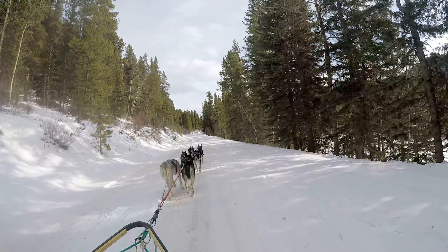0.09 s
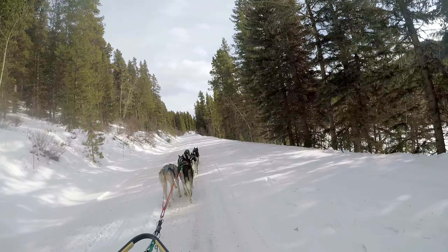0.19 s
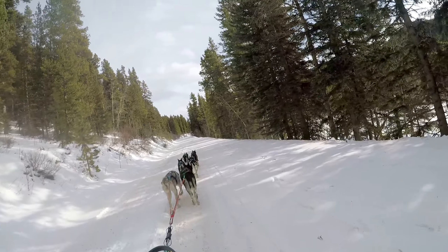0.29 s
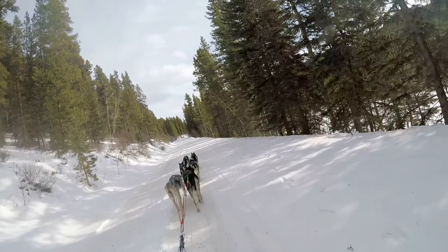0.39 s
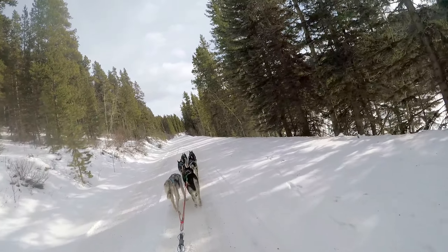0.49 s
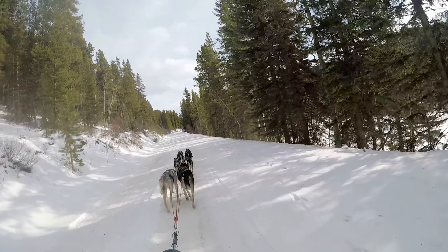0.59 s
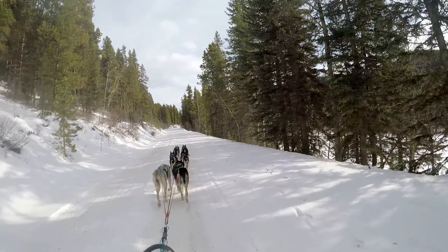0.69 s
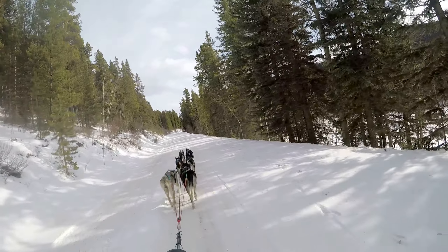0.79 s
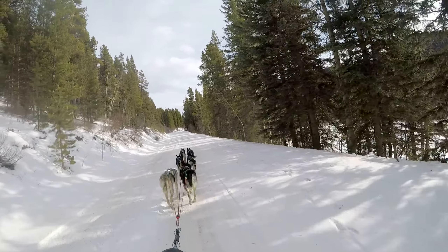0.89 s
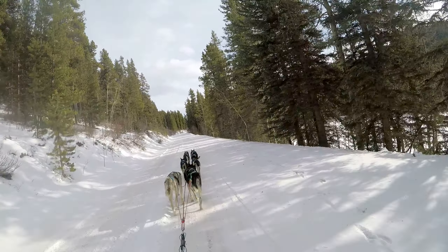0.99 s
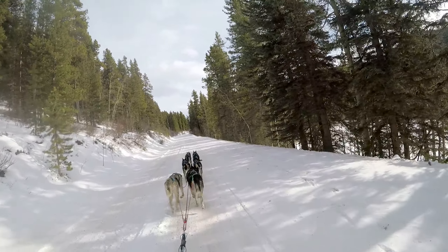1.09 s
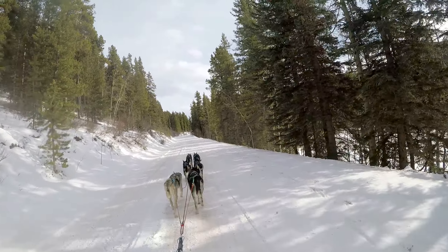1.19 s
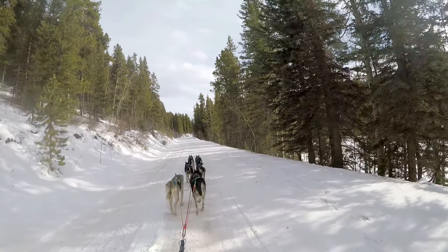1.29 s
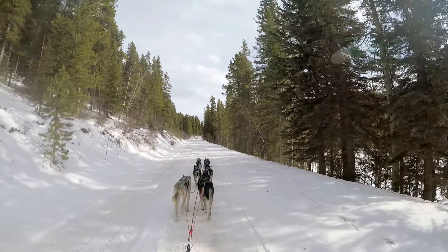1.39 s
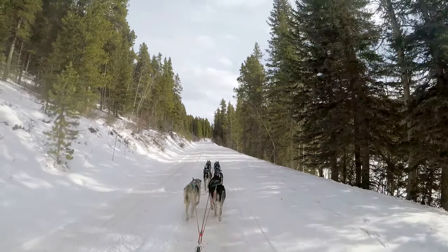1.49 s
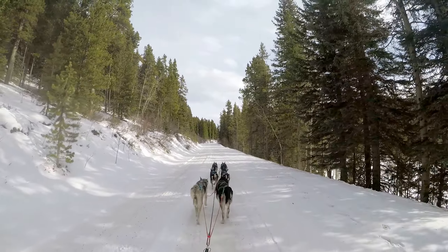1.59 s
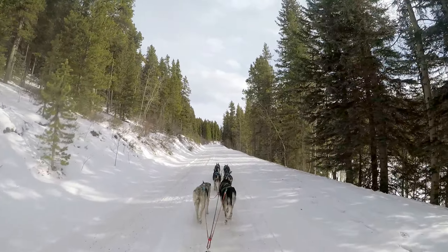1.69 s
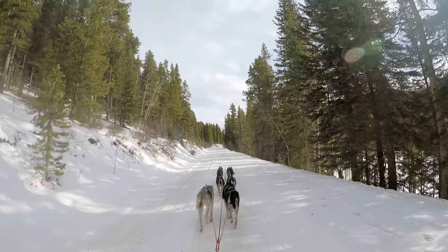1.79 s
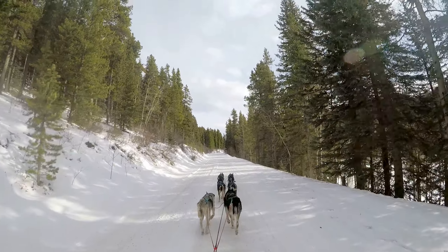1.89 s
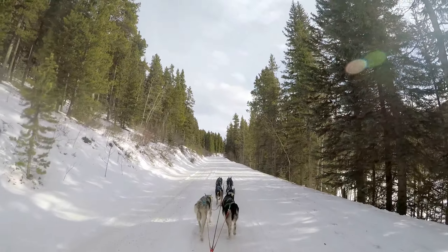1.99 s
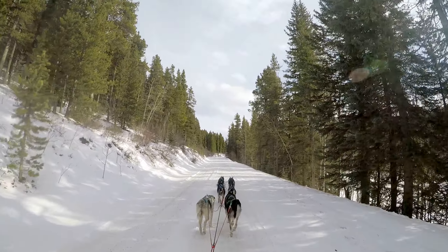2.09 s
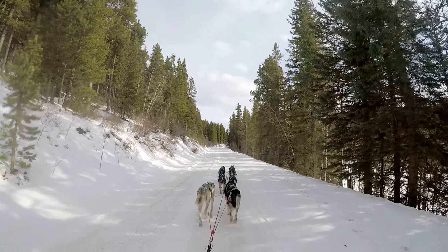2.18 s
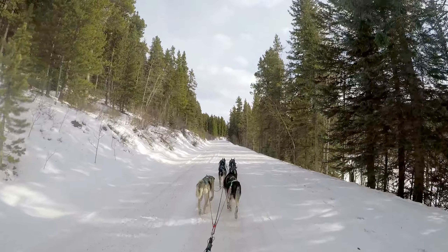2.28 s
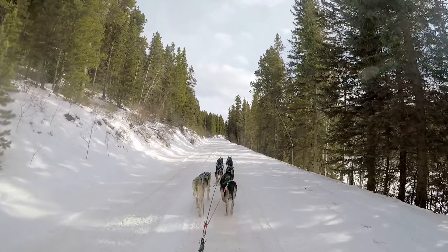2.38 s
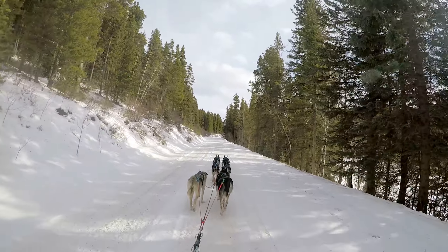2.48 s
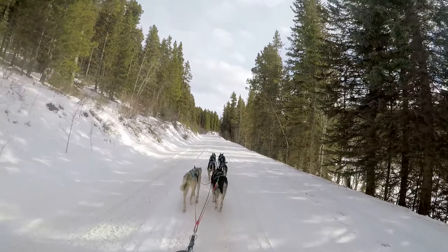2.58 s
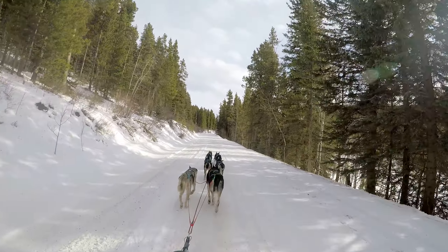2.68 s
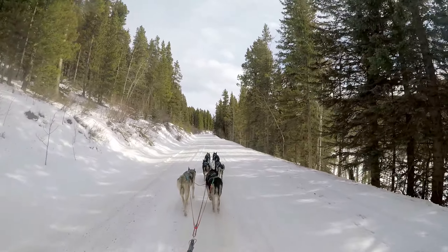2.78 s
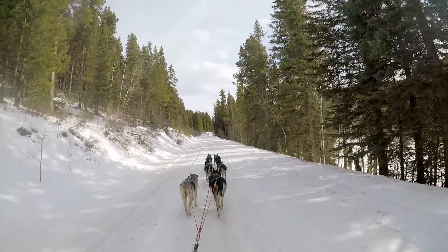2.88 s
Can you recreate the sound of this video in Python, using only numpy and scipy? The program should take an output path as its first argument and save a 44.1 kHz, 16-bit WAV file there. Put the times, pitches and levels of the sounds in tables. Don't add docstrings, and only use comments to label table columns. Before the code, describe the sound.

Sled runners scraping over packed snow, with hollow knocks, sharp clicks and low wind rumble

```python
import sys
import numpy as np
from scipy import signal
from scipy.fft import rfft, irfft, next_fast_len
from scipy.io import wavfile
from scipy.ndimage import uniform_filter1d, map_coordinates

SR = 44100
rng = np.random.default_rng(int(sys.argv[2]) if len(sys.argv) > 2 else 0)


def dump_mix(stems):
    frames = np.atleast_2d(stems).T
    limited = np.clip(frames, -1, 1)
    pcm = np.round(limited * 32767).astype(np.int16)
    wavfile.write(sys.argv[1], SR, pcm)


def field_ratio(decibels):
    return 10 ** (np.asarray(decibels, dtype=float) / 20)


N = 130095


def unit(x):
    return x / np.sqrt(np.mean(x ** 2) + 1e-20)


def along(points, hz):
    f, v = np.transpose(points)
    return np.interp(np.log(hz + 1), np.log(f + 1), v)


def curves(rows):
    s, *cols = np.transpose(rows)
    return [np.interp(np.arange(N) / SR, s, c) for c in cols]


def wobble(rate):
    return map_coordinates(rng.standard_normal(N // 200), [np.arange(N) * rate / SR])


def filtered(x, response):
    m = next_fast_len(N + SR // 2)
    return irfft(rfft(x, m) * response(np.fft.rfftfreq(m, 1 / SR)), m)[..., :N]


def body(modes, top_hz=2400):
    def response(f):
        total = 0
        for k, (centre_hz, width_hz, db) in enumerate(modes):
            loss = 1j * f * width_hz
            total = total + (-1) ** k * field_ratio(db) * loss / (centre_hz ** 2 - f * f + loss)
        return total / (1 + 1j * f / top_hz * 1.246 - (f / top_hz) ** 2) ** 2
    return response


def grains(rate, spread_db):
    chance, sign, size = rng.random((3, N))
    hit = chance < rate / SR
    return unit(hit * np.sign(sign - 0.5) * field_ratio(-spread_db * np.log(size + 0.02)))


def add_at(out, start_s, burst):
    out[:, round(start_s * SR):][:, :burst.shape[1]] += burst


# freq_hz, share_0_1
TIED = [(60, 1), (200, 0.47), (700, 0.57), (2500, 0.6), (6000, 0.5)]
# freq_hz, phase_rad
TURN = [(40, 1.17), (200, 2.3), (700, 2.24), (3000, 2.24), (9000, 2.3)]


def ports(push, other, centre, across, side_db):
    tie = lambda f: np.clip(along(TIED, f), 0, 1)
    mid = filtered(push, centre)
    tied = filtered(push, lambda f: across(f) * tie(f) * np.exp(1j * along(TURN, f)))
    free = filtered(other, lambda f: across(f) * np.sqrt(1 - tie(f) ** 2))
    side = field_ratio(side_db) * (tied + free)
    return np.array([mid + side, mid - side]), np.sqrt(np.mean(mid ** 2))


# start_s, strength_db, sway_over_strength_db
WIND = [(0, -30, -10), (.3, -24.5, -2.5), (.42, -19, -7.5), (.68, -22.5, -11), (.74, -20, 3),
        (.97, -18.5, -24), (1.04, -17.5, -5), (1.3, -10, -9), (1.6, -13.5, -6), (1.85, -18.5, 5),
        (2.1, -12.5, -10), (2.24, -9.5, -14), (2.28, -25.5, -9), (2.38, -19, 6.5), (2.5, -14.5, 2),
        (2.62, -18, -6.5), (2.75, -36, -10.5), (2.95, -52, 21.5)]
# freq_hz, width_hz, level_db
HOUSING = [(67, 46.3, -5), (91.76, 19.4, 2), (120.9, 23.8, -8.5)]
# freq_hz, width_hz, level_db
MOUNT = [(29, 22, -12), (43.7, 14.3, -1), (52.5, 7.2, -4)]
LUMPS_DB, LUMPS_PER_S = 1.2, 12
WIND_SIDE_DB, SWAY_SIDE_DB = -6, -15.5


def wind():
    strength_db, sway_db = curves(WIND)
    push = rng.standard_normal((4, N)) * field_ratio(LUMPS_DB * wobble(LUMPS_PER_S))
    shake = lambda f: body(HOUSING)(f) / (1 + (f / 125) ** 6)
    sway = lambda f: body(MOUNT)(f) / (1 + (f / 70) ** 4)
    ring, ring_rms = ports(*push[:2], shake, shake, WIND_SIDE_DB)
    slow, slow_rms = ports(*push[2:], sway, sway, SWAY_SIDE_DB)
    return field_ratio(strength_db) * (ring / ring_rms + field_ratio(sway_db) * slow / slow_rms)


# start_s, peak_db, pitch_hz
TICKS = [(0.6674, -28, 1850), (0.8006, -24, 1790), (0.9243, -18.5, 2010), (0.9565, -27, 2010),
         (1.0084, -21, 1640), (1.059, -25, 1880), (1.1763, -31, 1830), (1.274, -21.5, 1800),
         (1.4324, -41, 2080), (1.5159, -27, 1400), (1.5496, -51, 1500), (1.6377, -40.5, 1800),
         (1.6871, -45.5, 2000), (1.706, -38, 2000), (1.758, -37, 2040), (1.7818, -37, 1480),
         (1.7922, -30.5, 2150), (1.8637, -35.5, 1970), (1.8831, -33, 1800), (2.1425, -46.5, 2000),
         (2.176, -47.5, 1950), (2.2103, -44, 1700), (2.368, -40, 1690), (2.4157, -42, 1500),
         (2.5032, -37.5, 2003), (2.5385, -34.5, 1800)]
# start_s, peak_db, pitch_hz
PINGS = [
    (0.8955, -30, 3100),
    (1.1, -34, 5400),
    (1.179, -29, 5770),
    (1.198, -31.5, 3400),
    (1.29, -39, 4800),
    (1.7745, -45, 4450),
    (1.7843, -36, 3530),
    (1.786, -39, 4100),
    (2.2317, -32.5, 4370),
]
# start_s, peak_db, pitch_hz
CLACKS = [
    (0.357, -20.5, 662),
    (0.478, -28, 430),
    (0.609, -35.5, 750),
    (0.896, -27, 420),
    (0.9245, -13.5, 628),
    (1.008, -21, 484),
    (1.2695, -27.5, 600),
    (1.432, -35, 800),
    (1.705, -37, 650),
    (1.793, -33.5, 690),
]
TICK_S, TICK_RISE_S = 0.0013, 0.0008
TICK_DB, TICK_SIDE_DB = 5, -3.5


def ticks():
    out, t = np.zeros((2, N + SR // 50)), np.arange(SR // 50) / SR
    for start_s, db, hz in TICKS + PINGS + CLACKS:
        turn = rng.uniform(0, 2 * np.pi)
        near = rng.normal([[0.87], [1], [1.13]], 0.03)
        near = near - near.mean() + 1
        decay_s = TICK_S * max(1, np.sqrt(2000 / hz))
        fade = np.exp(-t / decay_s) * (1 - np.exp(-t / TICK_RISE_S)) ** 2
        angle = 2 * np.pi * hz * near * t
        mid = 1.33 * fade * np.sin(angle).sum(0)
        side = 1.33 * fade * np.sin(angle + turn).sum(0)
        add_at(out, start_s, field_ratio(db + TICK_DB) * (mid + field_ratio(TICK_SIDE_DB) * side * np.array([[1], [-1]])))
    return out[:, :N]


# start_s, peak_db, centre_hz
CRACKS = [(0.3593, -24.5, 1480), (0.9268, -25, 4000), (0.935, -36, 4520), (1.0068, -33.5, 2980),
          (1.099, -30, 5040), (1.1761, -28, 3450), (1.189, -42, 4500), (1.2696, -28.5, 4250),
          (1.306, -33.5, 4500), (1.3218, -31, 5500), (1.335, -36, 5500), (1.4232, -42, 4800),
          (1.4681, -38, 2900), (1.479, -45, 2600), (1.5222, -31.5, 5500), (1.5258, -33.5, 6000),
          (1.535, -41, 4500), (1.7895, -44, 6430), (1.8637, -40.5, 2600), (2.232, -23.5, 4300),
          (2.2341, -31, 5800), (2.539, -39.5, 2200)]
CRACK_TOP_HZ, CRACK_Q, CRACK_S, CRACK_GRIT = 7800, 1.9, 0.001, 0.5
CRACK_DB, CRACK_SIDE_DB = 0, -6


def cracks():
    out, t = np.zeros((2, N + SR // 100)), np.arange(SR // 100) / SR
    for start_s, db, hz in CRACKS:
        crumble = np.exp(-t / CRACK_S) * rng.standard_normal((2, len(t)))
        snap = (t == 0) + CRACK_GRIT * crumble
        burst = signal.lfilter(*signal.iirpeak(hz, CRACK_Q, SR), snap)
        mid, side = burst / np.abs(burst).max(axis=1, keepdims=True)
        add_at(out, start_s, field_ratio(db + CRACK_DB) * (mid - field_ratio(CRACK_SIDE_DB) * side * np.array([[1], [-1]])))
    return filtered(out[:, :N], lambda f: 1 / (1 + (f / CRACK_TOP_HZ) ** 8))


# start_s, peak_db, length_s
CRUNCHES = [(0.467, -37, 0.045), (0.715, -51, 0.015), (0.78, -35, 0.012), (0.919, -31, 0.022),
            (1.009, -29.5, 0.035), (1.094, -26.5, 0.013), (1.185, -28.5, 0.022), (1.266, -35.5, 0.057),
            (1.317, -31, 0.018), (1.466, -38.5, 0.013), (1.52, -32, 0.011), (1.783, -37.5, 0.019),
            (2.21, -46, 0.012), (2.23, -35.5, 0.022)]
# freq_hz, level_db
GLIDE = [(1290, 0.5), (2200, 3.5), (2720, 2), (6470, -3.5), (12400, -20), (14200, -36), (15500, -81)]
CRUNCH_DB, CRUNCH_SIDE_DB, CRUNCH_RISE_S, CRUNCH_TOP_HZ = -10, -3.5, 0.001, 7800


def crunches():
    t, shape = np.arange(N) / SR, np.zeros(N)
    for start_s, db, length_s in CRUNCHES:
        u = np.clip(t - start_s, 0, None)
        shape += field_ratio(db + CRUNCH_DB) * (1 - np.exp(-u / CRUNCH_RISE_S)) * np.exp(-(u / length_s) ** 2)
    push = grains(2800, 7) + 1.5 * rng.standard_normal((2, N))

    def bright(f):
        colour = field_ratio(along(GLIDE, np.maximum(f, 3000)))
        return colour * f / (f + 900) / (1 + (f / CRUNCH_TOP_HZ) ** 8)

    pair, rms = ports(*push, bright, bright, CRUNCH_SIDE_DB)
    return shape * pair / rms


# start_s, peak_db, rattle_over_peak_db, pitch_hz, rattle_across_db
KNOCKS = [(0.326, -21, -4.5, 228, 11.5), (0.355, -17.5, -10.5, 200, 16), (0.468, -28.5, -13, 215, 23),
          (0.595, -20, -14.5, 213, 14), (0.699, -21, -9, 258, 4), (0.738, -15.5, -43, 260, 9),
          (0.828, -16, -21, 273, -2), (0.9226, -12, -8, 153, -7), (1.007, -12, -12.5, 285, 2),
          (1.147, -11.5, -12.5, 217, 11.5), (1.27, -18.5, -10, 148, 7), (1.3, -15, -16.5, 253, 12),
          (1.433, -29.5, -4, 324, 10), (1.707, -19, -18, 277, 10), (1.791, -14.5, -16, 203, 11),
          (1.861, -24.5, -34.5, 259, 17), (2.138, -29, -10, 157, 15), (2.223, -21.5, -11, 275, 14)]
# start_s, length_s, level_db, pitch_hz
HUM = (0.92, 0.7, -28.5, 315)
# freq_hz, width_hz, level_db
FRAME = [(137.2, 31, 1), (221.5, 37, 1.5), (277.2, 41, 0.5), (318.7, 31.4, -1), (380, 41, -8)]
# freq_hz, width_hz, level_db
SCRAPE = [(438, 47.4, 2.5), (687, 131, -3), (846, 76, -3.5), (1157, 133, -9.5), (1400, 220, -10),
          (1873, 326, -8.5), (2190, 200, -10)]
# freq_hz, width_hz, level_db
ACROSS = [(215, 7.2, 3), (430, 130, -5.5), (729, 60, 3.5), (841, 117, -2.5), (990, 450, -6.5),
          (1180, 130, -7.5), (1560, 300, -13.5), (1800, 120, -13.5)]
KNOCK_RISE_S, KNOCK_DB, BLOW_DB = 0.00096, 2.5, 40
THUMP_T60_S, THUMP_SIDE_DB = 0.11, -10.5
SNAP_S, RATTLE_S, RATTLE_RISE_S = 0.01, 0.0097, 0.0026
RATTLE_DB, RATTLE_TOP_HZ = 21, 1300


def knocks():
    t = np.arange(SR // 3) / SR
    thump, push = np.zeros((2, 2, N + len(t)))
    blows = np.zeros(N)
    decay_db = -60 * t / THUMP_T60_S
    rise = (1 - np.exp(-t / KNOCK_RISE_S)) ** 2
    fade = np.exp(-t / np.array([[SNAP_S], [RATTLE_S]])) * (1 - np.exp(-t / RATTLE_RISE_S))
    for start_s, db, rattle_db, hz, across_db in KNOCKS:
        phase = rng.uniform(0, 2 * np.pi) + np.array([[0], [1.4]])
        add_at(thump, start_s, field_ratio(db + KNOCK_DB + decay_db) * rise * np.sin(2 * np.pi * hz * t + phase))
        blows[round((start_s + KNOCK_RISE_S) * SR)] = field_ratio(db + BLOW_DB) * np.sign(np.cos(phase[0, 0]))
        rattle = field_ratio(db + rattle_db + np.array([[0], [across_db]]))
        add_at(push, start_s, rattle * fade * rng.standard_normal((2, len(t))))
    start_s, length_s, db, hz = HUM
    swell = np.sin(np.pi * np.clip(t / length_s, 0, 1))
    hum = field_ratio(db) * swell * np.sin(2 * np.pi * hz * t + 0.91 * wobble(17)[:len(t)])
    add_at(thump[:1], start_s, hum[None])
    frame = filtered(blows, body(FRAME + [(616, 200, -20.0)], 690))
    mid = thump[0, :N] + frame + field_ratio(RATTLE_DB) * filtered(push[0, :N], body(SCRAPE, RATTLE_TOP_HZ))
    side = field_ratio(THUMP_SIDE_DB) * thump[1, :N]
    side = side + field_ratio(RATTLE_DB) * filtered(push[1, :N], body(ACROSS, RATTLE_TOP_HZ))
    return np.array([mid + side, mid - side])


# start_s, hiss_db, judder_db, scrape_db
RUNNERS = [(0, -44, -40, -44), (.2, -45, -38, -36.5), (.45, -44, -34, -33.5), (.7, -46, -32.5, -35.5),
           (.78, -43, -31.5, -36.5), (1.0, -45.5, -28.5, -36.5), (1.3, -50, -32, -35),
           (1.38, -54, -37.5, -43), (1.75, -55.5, -34.5, -46.5), (1.95, -59, -47.5, -50.5),
           (2.4, -60.5, -39, -51), (2.68, -61, -45.5, -53.5), (2.95, -57, -43, -45)]
# freq_hz, level_db
GLIDE_SIDE = [(1500, 5.5), (2400, -2), (4200, -5.5), (6000, 0), (8000, 2), (13000, -1.5)]
# start_s, scrape_rise_db, length_s
PATCHES = [(0.077, 0, 0.0057), (0.292, 2.5, 0.015), (0.357, 0.5, 0.02), (0.481, 5.5, 0.025),
           (0.542, 1.5, 0.03), (0.603, 3.5, 0.015), (0.693, 8, 0.016), (0.887, 8.5, 0.015),
           (0.99, 4, 0.024), (1.165, 3.5, 0.005), (1.18, 8.5, 0.011), (1.48, 8, 0.014), (1.554, 2, 0.017),
           (1.663, 2, 0.02), (1.796, 4.5, 0.03), (2.153, 6, 0.022), (2.234, 17, 0.02), (2.424, 5, 0.02),
           (2.52, 7, 0.027)]
GLIDE_SIDE_DB, GRIT_PER_S, GRIT_SPREAD_DB, GRIT_DB = 0.5, 1000, 7.5, -6.5
JUDDER_PER_S, JUDDER_SPREAD_DB, JUDDER_BED_DB, JUDDER_SIDE_DB = 250, 3, 1, -4
SCRAPE_PER_S, SCRAPE_SIDE_DB = 1200, 7.5
SURGES_PER_S, SURGE_DB, RUB_SURGE_DB = 16, 2.6, 1.52


def runners():
    hiss_db, judder_db, scrape_db = curves(RUNNERS)
    snow = rng.standard_normal((2, N)) * field_ratio(0.56 * wobble(25.08))
    snow = snow + field_ratio(GRIT_DB) * grains(GRIT_PER_S, GRIT_SPREAD_DB)
    centre = lambda f: field_ratio(along(GLIDE, f))
    across = lambda f: field_ratio(along(GLIDE, f) + along(GLIDE_SIDE, f))
    hiss, hiss_rms = ports(*snow, centre, across, GLIDE_SIDE_DB)

    slips = grains(JUDDER_PER_S, JUDDER_SPREAD_DB) + field_ratio(JUDDER_BED_DB) * rng.standard_normal((2, N))
    slips = slips * field_ratio(SURGE_DB * wobble(SURGES_PER_S))
    judder, judder_rms = ports(*slips, body(FRAME, 700), body(FRAME, 760), JUDDER_SIDE_DB)

    t = np.arange(N) / SR
    rough_db = sum(db * np.exp(-((t - s) / length_s) ** 2) for s, db, length_s in PATCHES)
    rubs = grains(SCRAPE_PER_S, 5.1) + 1.72 * rng.standard_normal((2, N))
    rubs = rubs * field_ratio(RUB_SURGE_DB * wobble(SURGES_PER_S) + rough_db)
    scrape, scrape_rms = ports(*rubs, body(SCRAPE), body(ACROSS), SCRAPE_SIDE_DB)

    out = field_ratio(hiss_db + 1.0 + 0.2 * rough_db) * hiss / hiss_rms
    out = out + field_ratio(judder_db + 5.0) * judder / judder_rms
    return out + field_ratio(scrape_db + 0.5) * scrape / scrape_rms


def scene():
    return wind() + ticks() + cracks() + crunches() + knocks() + runners()


def top_cut(x):
    return signal.sosfilt(signal.butter(12, 15640, fs=SR, output="sos"), x)


PORT_HZ, PORT_WIDE_HZ, PORT_DB = 6000, 840, 3
LEFT_DB, SELF_NOISE_DB = -1.5, -85.5
THIN_HZ, THIN_SHARE, TOP_HZ = 7600, 0.45, 15700


def record(dry):
    port = lambda f: field_ratio(PORT_DB * np.exp(-((f - PORT_HZ) / PORT_WIDE_HZ) ** 2))
    x = field_ratio([[LEFT_DB / 2], [-LEFT_DB / 2]]) * filtered(dry, port)
    x = x + field_ratio(SELF_NOISE_DB) * rng.standard_normal(x.shape)
    x = x / (1 + np.abs(x / 1.2) ** 4) ** (1 / 4)
    hz, _, z = signal.stft([x[0] + x[1], x[0] - x[1]], SR, nperseg=1024)
    field = uniform_filter1d(rng.standard_normal(z.shape), size=9, axis=1)
    field = unit(uniform_filter1d(field, size=3, axis=2))
    floor = -3 - 9 * (hz < 2500) + (2.6 + THIN_SHARE) / (1 + (THIN_HZ / (hz + 1)) ** 8)
    z = z * (field > floor[:, None]) * (hz < TOP_HZ)[:, None]
    mid, side = signal.istft(z, SR, nperseg=1024)[1][:, :N] / 2
    return top_cut(np.array([mid + side, mid - side]))


dry = scene()
out = record(dry)
dump_mix(out)
```